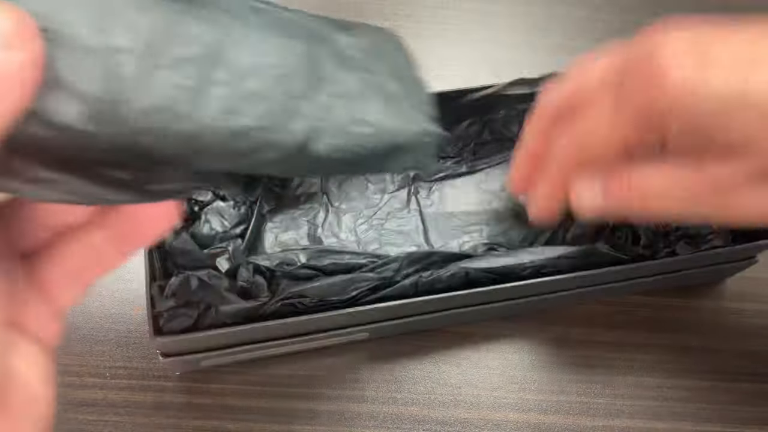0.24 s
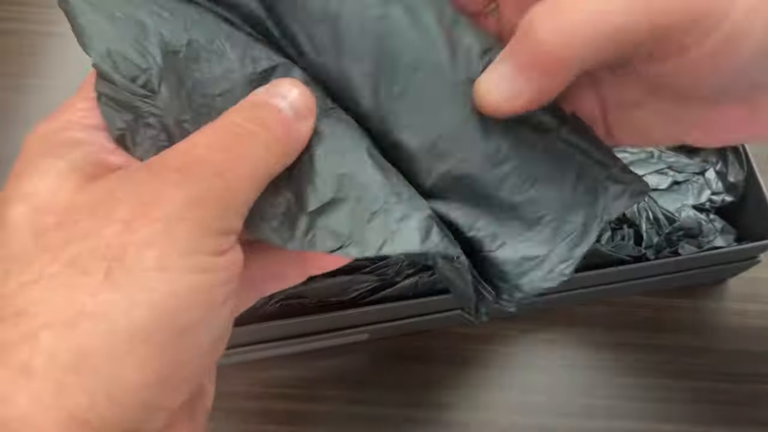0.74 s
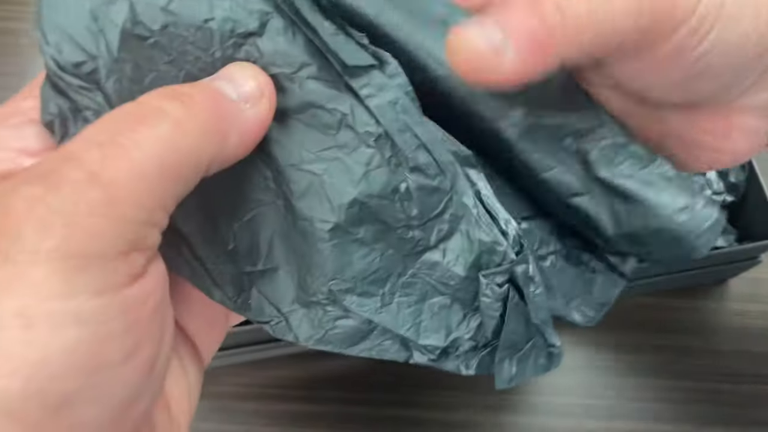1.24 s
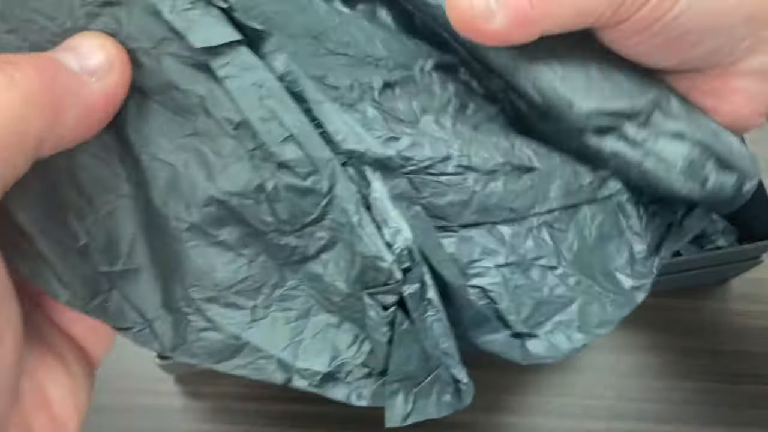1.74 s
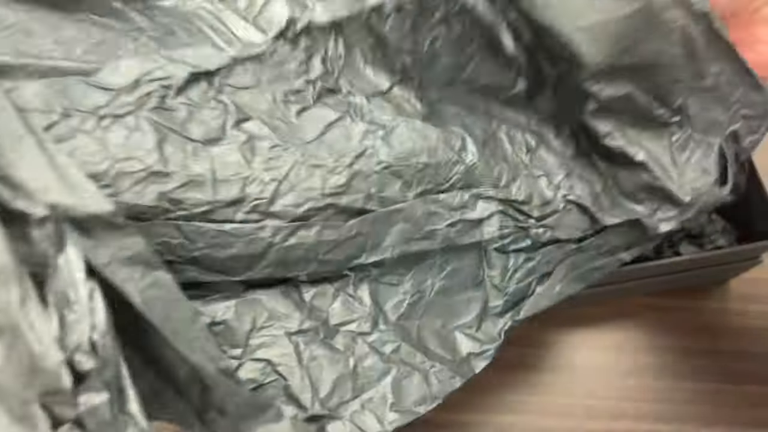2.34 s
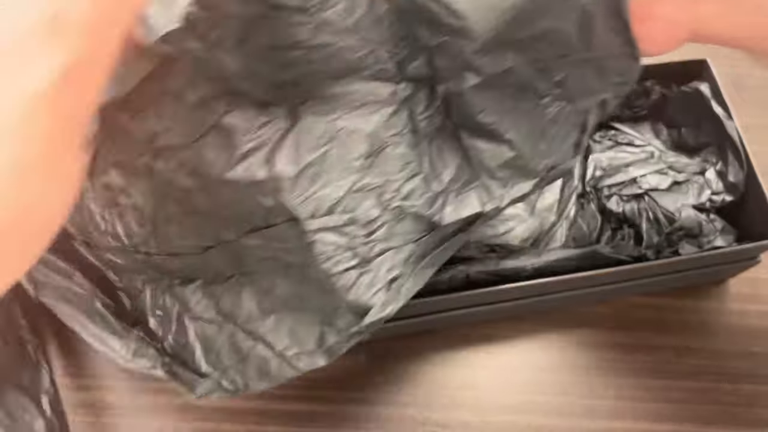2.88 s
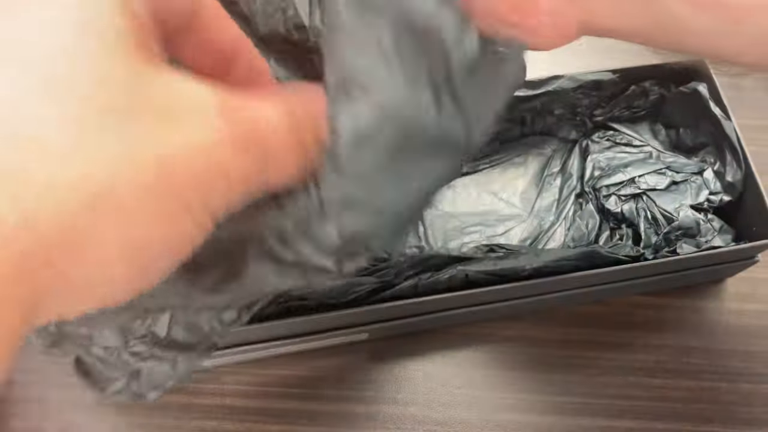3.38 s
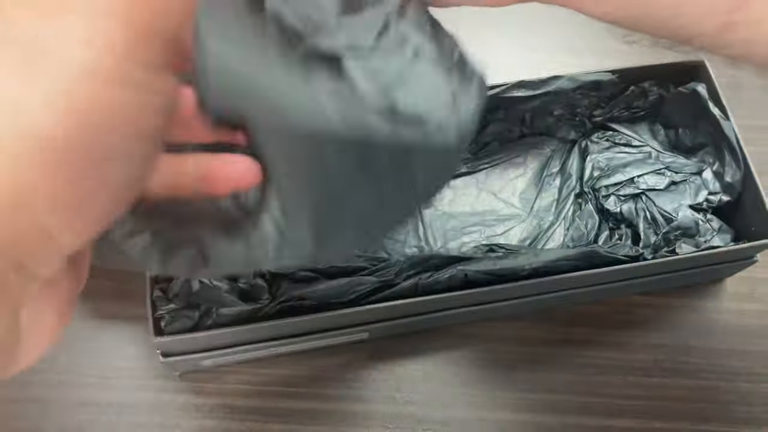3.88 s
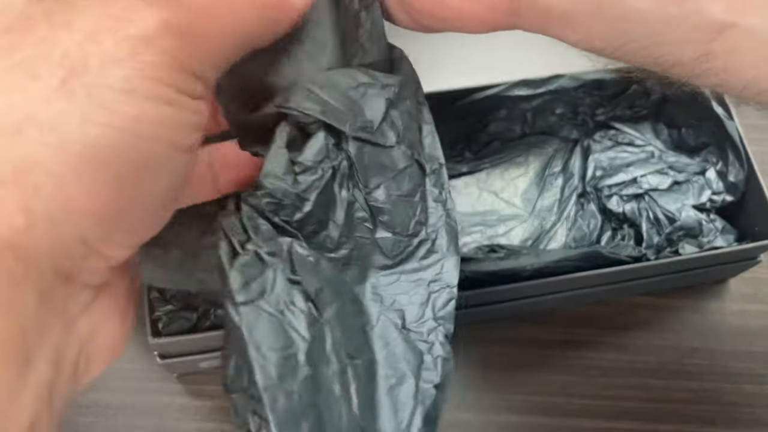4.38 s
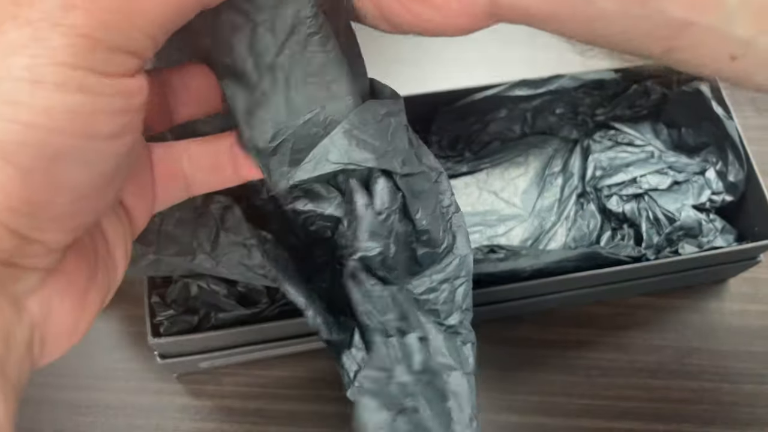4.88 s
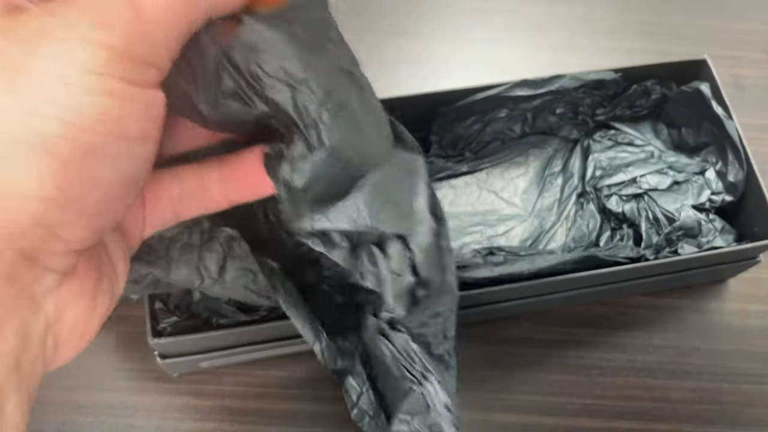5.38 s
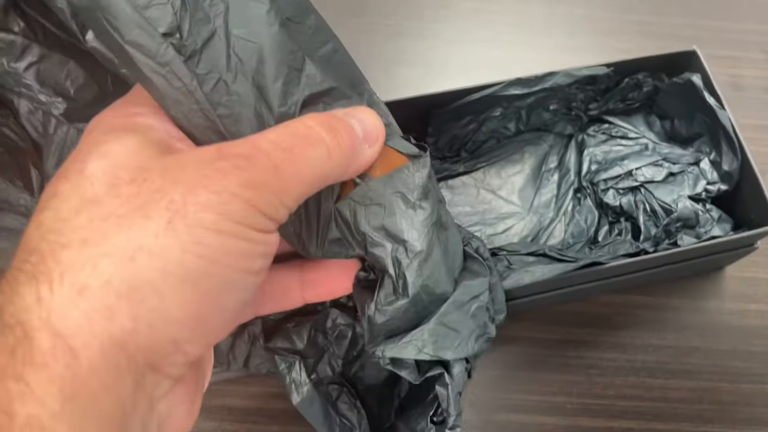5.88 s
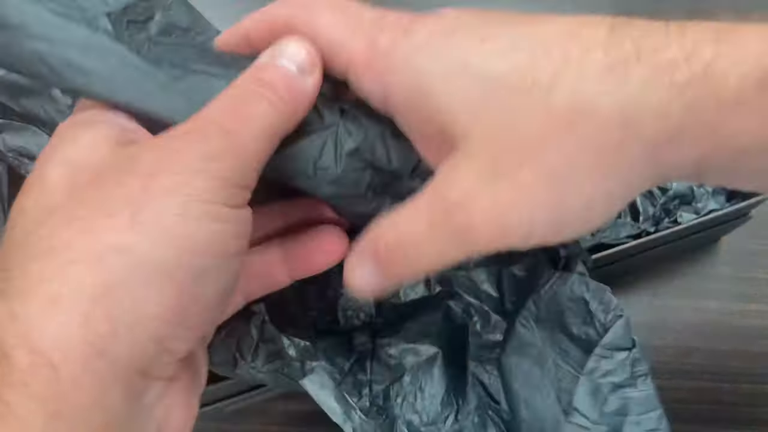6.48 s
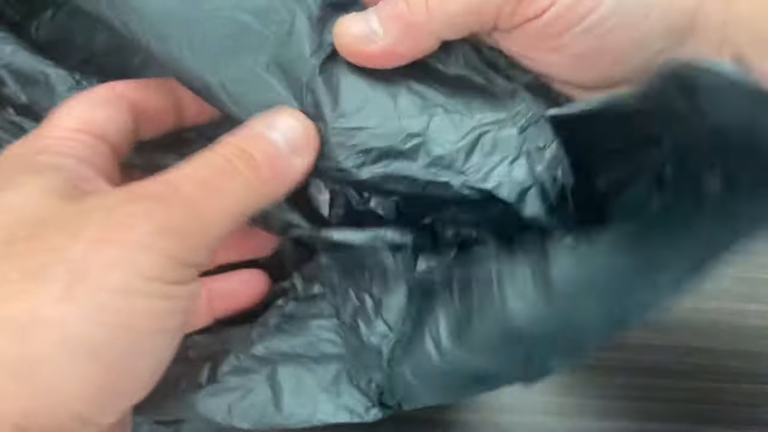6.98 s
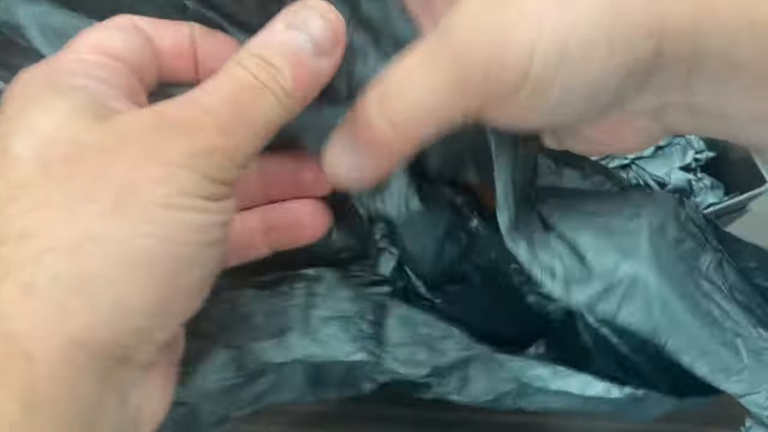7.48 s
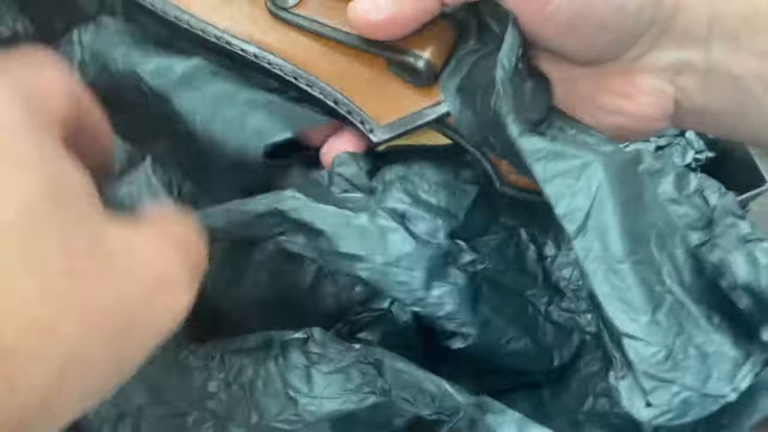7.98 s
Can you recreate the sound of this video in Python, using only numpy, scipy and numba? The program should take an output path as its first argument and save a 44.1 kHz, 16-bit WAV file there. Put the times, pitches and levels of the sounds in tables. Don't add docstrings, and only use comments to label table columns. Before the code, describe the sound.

Close, dry paper crinkling made of thousands of tiny clicks, bright and brittle, with lower, broader folding sounds at times. A fingertip taps the box once near the start. The rustling comes in spells, nearly stopping briefly before three seconds and again around four and a half, then runs fuller to the end. Small room with a very short tail and faint air rumble.

```python
import sys
import numpy as np
from scipy import signal
from scipy.fft import rfft, irfft
from scipy.io import wavfile
from scipy.ndimage import uniform_filter1d
from numba import njit

SR = 44100
rng = np.random.default_rng(int(sys.argv[2]) if len(sys.argv) > 2 else 0)


def materialize(psi):
    bounded = np.clip(np.atleast_2d(psi).T, -1, 1)
    quanta = np.round(bounded * 32767).astype(np.int16)
    wavfile.write(sys.argv[1], SR, quanta)


def boost(x):
    u = np.asarray(x, float) / 20
    return 10 ** u


N = 362943

LOW_HZ, HIGH_HZ = 180, 17000
PINCH_OCTAVES = 0.35


def rustle(count=40000, order=3):
    when, force = rng.random((count, 2)).T
    s = when * N / SR
    at = (when * N).astype(int)
    flurry_db = (0.063 * walk(30) + 2.0 * walk(70) + 2.0 * walk(300))[at]
    crease_db = flurry_db - 2.49 * np.log(1 - 0.99 * force)
    pitch, lag, share = rng.random((3, order, count))
    hz = LOW_HZ * (HIGH_HZ / LOW_HZ) ** pitch ** 0.6
    octave = np.log2(hz / LOW_HZ).astype(int)
    busy_db = 1.44 * np.array([walk(25) for _ in range(7)])
    crease_db = crease_db + busy_db[octave, at]
    worked_db = per_crease(hands, at, hz)
    pinch_db = per_crease(lambda t, f: stirred(t, f, PINCHES, PINCH_OCTAVES), at, hz)
    held = boost(1.6 * pinch_db)
    size = boost(crease_db + worked_db + 10.45 * share - 6.0) * (hz / 4000) ** 0.66
    start_s = s + 0.0006 * lag
    return patches(start_s.ravel(), hz.ravel(), 1.654 * held.ravel(), (size / np.sqrt(held)).ravel())


def walk(rate):
    k = int(SR / rate)
    steps = np.repeat(rng.standard_normal(N // k + 1), k)
    return 0.72 * uniform_filter1d(uniform_filter1d(steps, k), k)[:N]


def patches(s, hz, cycles, size):
    pole = np.exp((2j * np.pi - 1 / np.maximum(cycles, 0.2)) * hz / SR)
    start, turn = np.exp(2j * np.pi * rng.random((len(s), 2)).T)
    return rings(np.clip(s * SR, 0, N - 1).astype(np.int64), pole, size * start, turn)


@njit
def rings(start, pole, size, turn):
    out = np.zeros((2, N))
    for k in range(len(start)):
        z, fade = size[k] + 0j, abs(pole[k])
        rise, step = 1., fade ** 4
        for i in range(start[k], min(N, start[k] + int(-5 / np.log(fade)) + 1)):
            ring = z * (1 - rise)
            out[0, i] += ring.real
            out[1, i] += (ring * turn[k]).real
            z, rise = z * pole[k], rise * step
    return out


def per_crease(control, at, hz, size=64):
    span = HIGH_HZ / LOW_HZ
    chart_s = np.arange(N // size + 1) * size / SR
    chart_hz = LOW_HZ * span ** np.linspace(0, 1, size + 1)[:, None]
    row = np.round(size * np.log(hz / LOW_HZ) / np.log(span)).astype(int).clip(0, size)
    return control(chart_s, chart_hz)[row, at // size]


# [t/s, effort/dB, share of broad folding/dB, tautness of the sheet/dB]
GRIP = [(0.0, -50.5, 2, -4.6), (0.03, -46, -9, -2.5), (0.16, -49.5, 2.9, -1.3), (0.4, -60, 2.6, 0.5),
        (0.42, -49, -6, 1), (1.05, -46.5, -1.5, -1.5), (1.15, -47.5, -1.5, -1.5), (2.06, -48.5, -2.5, 0.0),
        (2.69, -52.5, 2.5, -3), (2.94, -51, -2, 1), (2.96, -45.5, 7, 3), (3.59, -45, 0, 0.8),
        (4.61, -46.5, 3.5, 0.4), (5.29, -48, 0, 3.5), (5.79, -44.5, 1.7, 2), (6.14, -46, 1.5, -2.2),
        (7.29, -42.5, 1.3, 0.3), (8.23, -44.5, 4, -0.6)]
# [t/s, length/s, strength/dB, ring of the patches most stirred f/Hz]
TUGS = [(0.429, 0.021, 9, 2950.0), (0.673, 0.3, 10.5, 246), (0.905, 0.061, 6.5, 3000.0),
        (1.044, 0.13, 5, 2010.0), (1.187, 0.046, 7, 250.0), (1.5, 0.26, 0.5, 1500),
        (1.536, 0.07, 4, 3640.0), (1.73, 0.039, 7, 3070.0), (1.837, 0.15, 5.5, 500.0),
        (2.047, 0.15, 6.5, 1910.0), (2.307, 0.21, 6, 1590.0), (2.587, 0.11, 7.5, 7470.0),
        (2.98, 0.1, 5, 2000), (3.167, 0.101, 3, 2880.0), (3.317, 0.091, 7.5, 2850), (3.85, 0.038, 4, 12000),
        (4.296, 0.023, 4, 500.0), (4.396, 0.058, 5.7, 8000.0), (4.765, 0.29, 4, 2820.0),
        (4.85, 0.148, 6, 7060.0), (5.059, 0.091, 5, 8740.0), (5.405, 0.073, 5, 2040),
        (5.647, 0.074, 3, 3390.0), (5.917, 0.026, -0.5, 700), (6.643, 0.02, 0, 3700),
        (6.706, 0.056, 6, 5040), (7.255, 0.12, 6, 1670), (7.406, 0.055, 4, 6780.0),
        (7.542, 0.025, 4.5, 750.0), (7.869, 0.045, 5, 8000.0)]
# [t/s, length/s, strength/dB, patch ring f/Hz]
PINCHES = [(0.933, .1, 3, 1300), (1.5, .25, 5, 1740), (2.072, 0.086, 2.5, 1900), (3.203, .3, 2.5, 400),
           (3.9, .15, 5, 450), (4.196, 0.22, 1, 2250), (4.35, .12, 8, 500), (4.783, 0.15, 5, 3480),
           (5.047, 0.058, 2, 13000), (5.915, 0.035, 7, 720), (6.645, 0.025, 4, 3720), (6.70, .07, 4, 4740),
           (7.071, 0.041, 8, 700), (7.385, 0.036, 7.5, 4300)]
# [t/s, length/s, depth/dB]
PAUSES = [(0.283, 0.19, 10.5), (0.381, 0.059, 6), (1.142, 0.13, 7.5), (1.403, 0.057, 3), (1.61, 0.17, 2),
          (1.822, 0.035, 9), (2.102, 0.015, 13), (2.21, 0.03, 2), (2.484, 0.023, 5), (2.736, 0.069, 7.5),
          (2.809, 0.03, 9), (2.907, 0.076, -1), (3.333, 0.038, 8.5), (3.518, 0.058, 3), (3.94, 0.11, 2.5),
          (4.071, 0.054, 9), (4.461, 0.061, 10), (4.538, 0.047, 11.5), (4.842, 0.057, 10),
          (4.926, 0.068, 5.5), (5.189, 0.092, 2.5), (5.522, 0.023, 2.8), (6.076, 0.17, 5.5),
          (6.156, 0.015, 6), (6.515, 0.041, 2.5), (6.81, 0.047, 0.9), (7.575, 0.056, 3.5),
          (7.687, 0.027, 8), (8.008, 0.14, 5), (8.082, 0.083, 3.5)]


def hands(s, hz):
    t, effort_db, folds_db, taut_db = np.transpose(GRIP)
    pauses = np.transpose(PAUSES)
    tug_db = stirred(s, hz, TUGS, 2.3) + stirred(s, hz, PINCHES, PINCH_OCTAVES)
    pause_db = (hz / 3000) ** 0.082 * (pauses[2] @ swell(s, pauses))
    large = np.clip(np.log(1300 / hz) / 0.41, 0, 1)
    middle = np.clip(np.log(3000 / hz) / 0.26, 0, 1) - large
    fine = np.clip(np.log(hz / 5500) / 0.3, 0, 1)
    folds_db, taut_db = np.interp(s, t, folds_db), np.interp(s, t, taut_db)
    low = large * (folds_db - 2) + middle * (0.1 * folds_db - 0.59 * taut_db - 1.96)
    high = fine * (taut_db + 4.5)
    return np.interp(s, t, effort_db) + 0.96 * (tug_db - pause_db) + low + high


def stirred(s, hz, rows, octaves):
    rows = np.transpose(rows)
    favour = np.exp(-0.5 * (np.log2(hz / rows[3]) / octaves) ** 2)
    return (favour * rows[2]) @ swell(s, rows)


def swell(s, rows):
    return np.exp(-0.5 * ((s - rows[0][:, None]) / rows[1][:, None] * 2.5) ** 2)


# [t/s, patch ring f/Hz, ring peak level/dB, treble crack peak level/dB]
SNAPS = [(5.652, 3790, -37, -27), (1.2985, 1930, -33, -25), (1.439, 3640, -33, -27),
         (1.892, 4900, -20.5, -33), (2.5626, 4650, -39, -28), (2.9478, 1820, -32, -30),
         (2.991, 1320, -29, -30), (3.1423, 3700, -28, -35), (3.246, 3530, -24.5, -26.5),
         (3.275, 5040, -23, -30), (3.2932, 3920, -20, -30), (3.802, 3400, -30, -22),
         (4.1982, 1960, -38, -23), (4.6855, 4430, -23, -20), (4.8702, 2340, -39, -34),
         (5.036, 4950, -27, -26), (5.0474, 5100, -30, -25), (5.3625, 3500, -31, -24),
         (5.55, 2420, -29, -34), (5.6434, 4180, -30, -32), (6.4408, 2570, -25, -23),
         (6.562, 3640, -29, -27), (6.641, 3700, -29, -35), (6.6924, 4670, -29, -26),
         (6.8535, 3600, -34, -21), (7.0504, 1260, -32, -22), (7.2406, 2660, -45, -22),
         (7.368, 4530, -25, -33), (7.462, 1900, -26.5, -25), (7.876, 3470, -31, -30)]
# [t/s, patch ring f/Hz, ring peak level/dB, crack peak level/dB]
TICKS = [(0.2005, 3100, -31, -42), (0.2164, 4690, -49, -33.5), (0.2553, 2950, -42, -52),
         (0.2874, 1690, -45, -55), (0.3202, 2630, -49, -43), (0.338, 3850, -44, -56),
         (0.348, 3550, -45, -57), (0.395, 3040, -43, -43), (0.414, 4010, -45, -38),
         (0.425, 1990, -34.5, -40), (1.139, 1530, -42, -38), (2.6953, 4590, -47, -46),
         (2.7122, 4800, -31, -35.5), (2.7296, 2950, -31.5, -54), (2.7761, 3820, -30, -33),
         (2.7816, 4260, -38, -37), (2.796, 1840, -38, -48), (2.839, 2380, -32.5, -37),
         (2.852, 4500, -31, -38), (2.8938, 2670, -41, -35), (4.101, 1230, -38, -33),
         (4.4706, 5080, -39, -30), (4.5044, 5300, -32, -21.5), (4.5251, 3290, -43, -38),
         (4.5471, 2240, -38, -28), (4.555, 4840, -30, -31), (4.565, 3470, -23.5, -21.5),
         (6.141, 3430, -38, -32), (7.996, 1460, -37, -28), (8.0431, 4870, -36, -42)]


def snaps(order=8):
    s, hz, ring_db, crack_db = np.transpose(SNAPS + TICKS)
    near, pitch, lag = rng.random((len(s), 3, order)).transpose(1, 2, 0)
    near_hz = hz * 2.64 ** (2 * near - 1)
    crack_hz = 6000 * (HIGH_HZ / 6000) ** ((np.arange(order)[:, None] + pitch) / order)
    near_s, crack_s = (s + 0.0007 * lag).ravel(), (s + 0.0006 * lag).ravel()
    own = patches(s, hz, 4.2, boost(ring_db - 6.5))
    neighbours = patches(near_s, near_hz.ravel(), 0.95, np.tile(boost(ring_db - 9.0), order))
    crack = patches(crack_s, crack_hz.ravel(), 3.0, np.tile(boost(crack_db - 2.0), order))
    return own + neighbours + crack


# [t/s, level/dB, brightness/dB per octave]
KNOCKS = [
    (0.1101, -23, -9),
    (0.114, -34, 6.5),
]
# [f/Hz, level/dB, T60/s]
BOX = [(1137, 2.5, 0.019), (700, -32, 0.0075), (2500, -1, 0.0075), (4060, -13, 0.003)]


def knock():
    s, hit_db, bright_db = np.transpose(KNOCKS)[:, :, None]
    t = np.maximum(np.arange(SR // 4) / SR - s, 0)
    wall = 0
    for hz, db, t60 in BOX:
        mode_db = hit_db + db + bright_db * np.log2(hz / BOX[0][0]) - 60 * t / t60
        wall = wall + boost(mode_db) * np.sin(2 * np.pi * hz * t)
    return np.pad(wall.sum(axis=0), (0, N - SR // 4))


def room(x, size=256):
    t60_s, tail_db = 0.11, -2.5
    frames = signal.stft(x, nperseg=size)[2]
    keep = boost(-120 * size / 2 / SR / t60_s)
    energy = signal.lfilter([0, 1 - keep], [1, -keep], np.abs(frames) ** 2)
    scatter = signal.stft(rng.standard_normal(x.shape), nperseg=size)[2]
    tail = signal.istft(np.sqrt(energy) * scatter / np.std(scatter), nperseg=size)[1]
    return x + boost(tail_db) * tail[:, :N]


def read(hz, points_hz, values):
    return np.interp(np.log(np.maximum(hz, 1)), np.log(points_hz), values)


# [f/Hz, right minus left level/dB, right leads/rad, likeness/0-1]
PORTS = [(300, .3, .37, .93), (560, -.5, -1.21, .8), (1100, -3, -1.21, .82), (2000, -.5, 0, .4),
         (3000, -5.6, -1.57, .53), (4200, -3.4, -.51, .7), (5200, -3.5, -.68, .65), (5550, 1.3, .5, .6),
         (7000, -2.4, 1.86, .64), (8550, 0, 3.14, .97), (10300, 0, 3.96, .74), (11900, 0, 5.6, .72),
         (13000, 0, 6.28, .85)]
# [f/Hz, level/dB]
COLOUR = [(200, 7), (480, -0.5), (670, 4.5), (830, 1.5), (1200, 3), (1550, 1), (2200, 3), (3800, 3.5),
          (5250, 1.5), (5600, -5.5), (8500, 1.5), (13200, -3.5), (15500, -6)]
TOP_HZ = 15800


def ports(paths):
    hz = np.fft.rfftfreq(N, 1 / SR)
    points_hz, *columns = np.transpose(PORTS)
    right_db, lead, like = (read(hz, points_hz, c) for c in columns)
    bass_loss = 1 + (150 / (hz + 1)) ** 3
    common, stray = rfft(paths) * boost(read(hz, *np.transpose(COLOUR))) / bass_loss * (hz < TOP_HZ)
    right = boost(right_db) * np.exp(1j * lead) * (like * common + np.sqrt(1 - like ** 2) * stray)
    return irfft(np.array([common, right]), N)


# [f/Hz, level/dB per Hz]
AIR = [(12, -15), (20, -10), (65, -0.5), (119, 2.5), (240, -8.5), (287, -18), (420, -18), (550, -50),
       (920, -120)]
# [f/Hz, level/dB]
HUM = [(120.5, -60.5)]


def ventilation():
    t = np.arange(N) / SR
    colour = boost(read(np.fft.rfftfreq(N, 1 / SR), *np.transpose(AIR)))
    mid, side = rfft(rng.standard_normal((2, N))) * colour
    rumble = irfft(np.array([mid, mid * np.exp(0.35j) + boost(-11) * side]), N)
    effort_db = np.interp(t, *np.transpose(GRIP)[:2])
    air_db = -49 + 2.5 * walk(5) + 0.26 * (effort_db - effort_db.mean())
    hum = 0
    for hz, db in HUM:
        level = boost(db + 3 + 3.0 * walk(4))
        hum = hum + level * np.sin(2 * np.pi * hz * np.cumsum(1 + 0.021 * walk(6)) / SR)
    return rumble / np.std(rumble) * boost(air_db) + hum


def scene():
    paper, stiff, box = rustle(), snaps(), knock()
    snap_wet = 0.54
    echoing = room(paper + snap_wet * stiff + 0.33 * box)
    direct = (1.3 - snap_wet) * stiff + 0.38 * box
    return ports(echoing + direct) + ventilation()


def thrift(x, size=1024):
    lead, mono_hz = 2 * size - 838, 12400
    pair = np.array([x[0] + x[1], x[0] - x[1]])
    pair = np.pad(pair, ((0, 0), (lead, 3 * size - (N + lead) % size))) / 2
    n, line = np.arange(2 * size) + 0.5, np.arange(size) + 0.5
    window = np.sqrt(2 / size) * np.sin(np.pi * n / size / 2)
    basis = window * np.cos(np.pi / size * np.outer(line, n + size / 2))
    hops = pair.reshape(2, -1, size)
    frames = basis @ np.concatenate([hops[:, :-1], hops[:, 1:]], axis=2).transpose(0, 2, 1)
    hz, t = line * SR / size / 2, np.arange(1, hops.shape[1]) * size / SR
    wide, fine = band_energy(frames, count=16 * 2), band_energy(frames, count=4)
    both = wide.sum(axis=0)
    bar = boost(-15.5 + 5 * uniform_filter1d(rng.standard_normal(len(t)), size=3))
    overall = both[(hz > 3000) & (hz < TOP_HZ)].mean(axis=0)
    masked = (wide < bar * both) & (hz > 6800)[:, None]
    masked = masked | (fine < bar * boost(-3.5) * overall)
    masked[1, hz > mono_hz] = True
    masked[:, hz > TOP_HZ] = True
    ticks = uniform_filter1d((np.diff(pair, n=2) ** 2).sum(axis=0), size=128)[::128]
    jump = ticks[8:] / (uniform_filter1d(ticks, size=8, origin=3)[7:-1] + 1e-18)
    click_s = (np.flatnonzero(jump > 7.5) + 8) * 128 / SR
    steady = (np.abs(t[:, None] - click_s) > size / 2 / SR).all(axis=1)
    keep = ~(masked & (hz > 1300)[:, None] & steady)
    blocks = (basis.T @ (frames * keep)).transpose(0, 2, 1)
    lapped = (blocks[:, 1:, :size] + blocks[:, :-1, size:]).reshape(2, -1)
    mid, side = lapped[:, lead - size:lead - size + N]
    return np.array([mid + side, mid - side])


def band_energy(frames, count):
    lines = np.arange(frames.shape[1])
    return np.add.reduceat(np.abs(frames) ** 2, lines[::count], axis=1)[:, lines // count] / count


def band_limit(x):
    return signal.sosfilt(signal.butter(12, 16410, fs=SR, output="sos"), x)


def record(dry):
    mix = thrift(dry)
    return band_limit(mix)


dry = scene()
out = record(dry)
materialize(out)
```